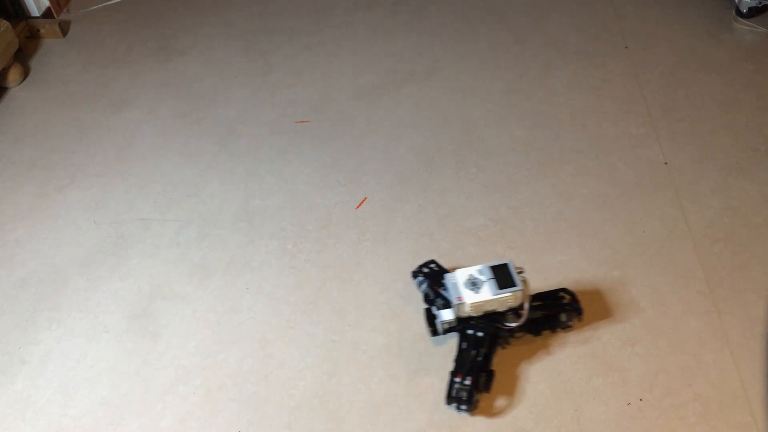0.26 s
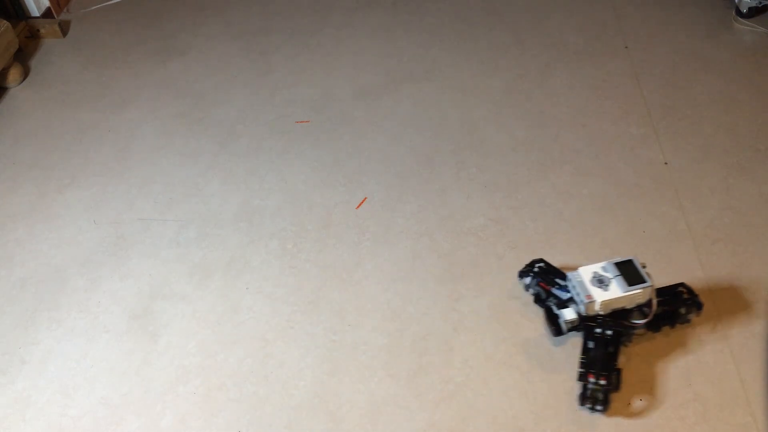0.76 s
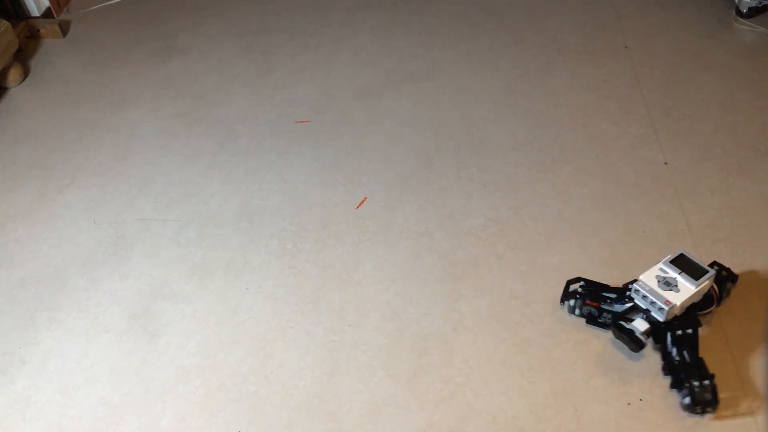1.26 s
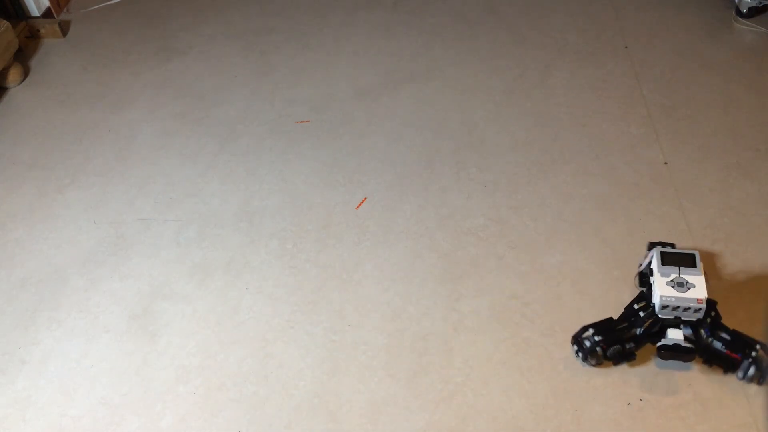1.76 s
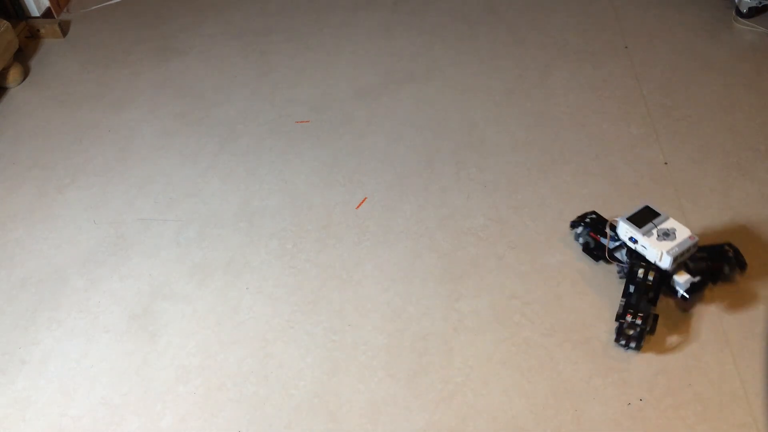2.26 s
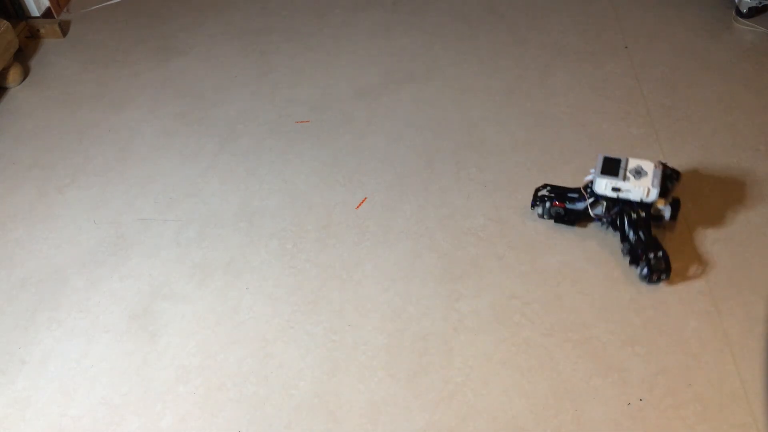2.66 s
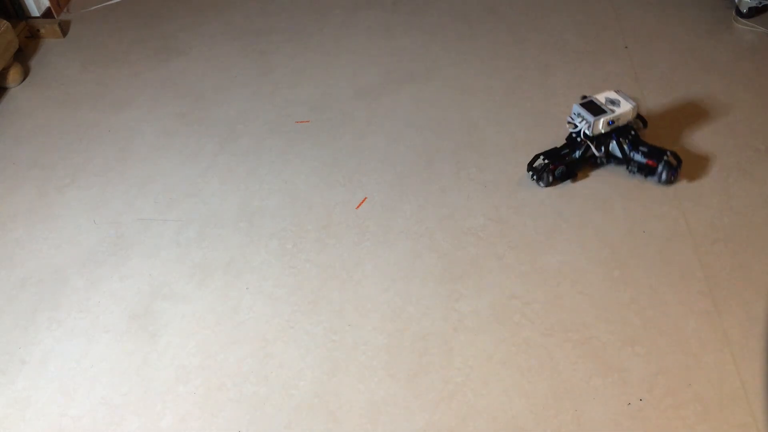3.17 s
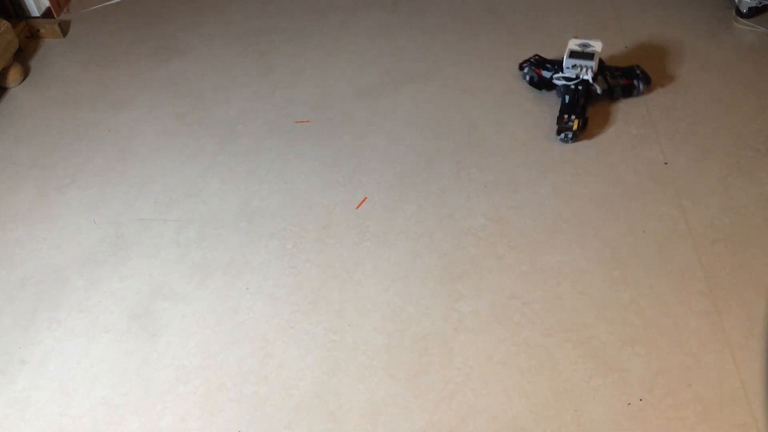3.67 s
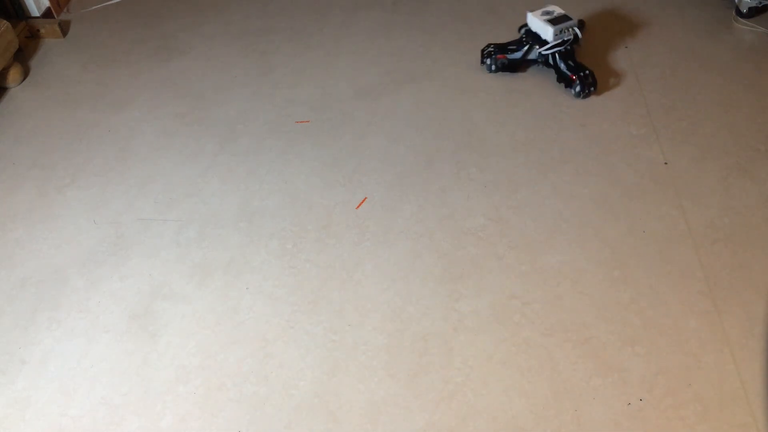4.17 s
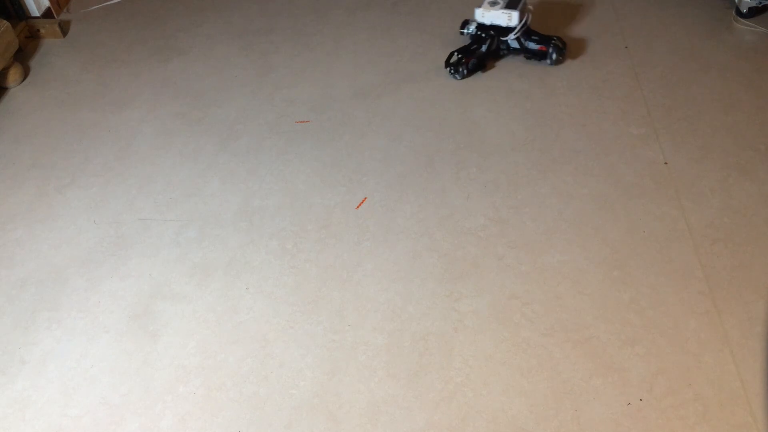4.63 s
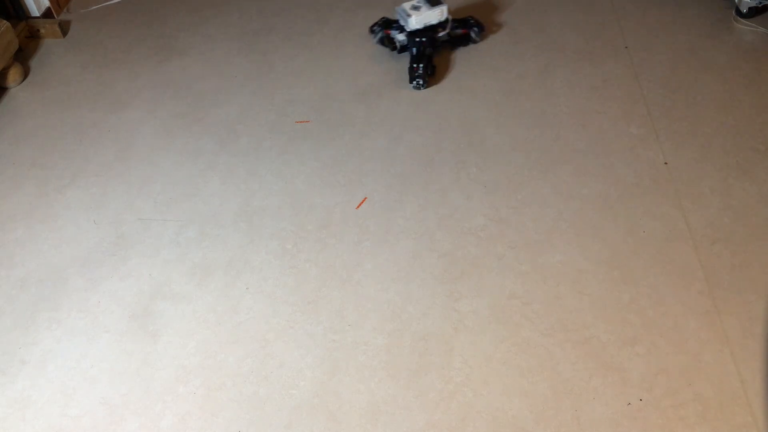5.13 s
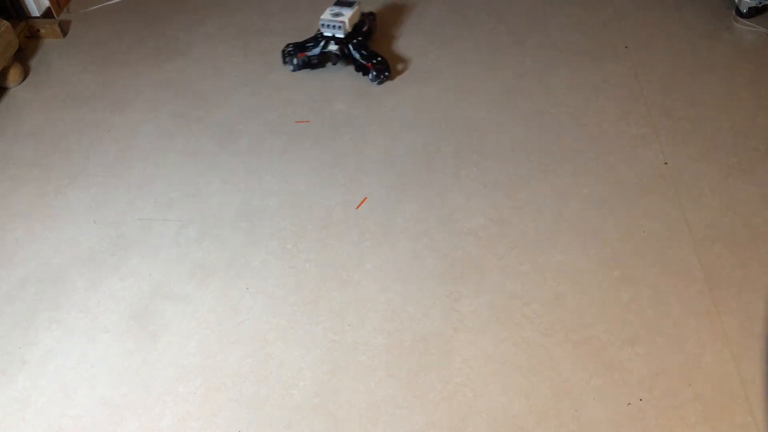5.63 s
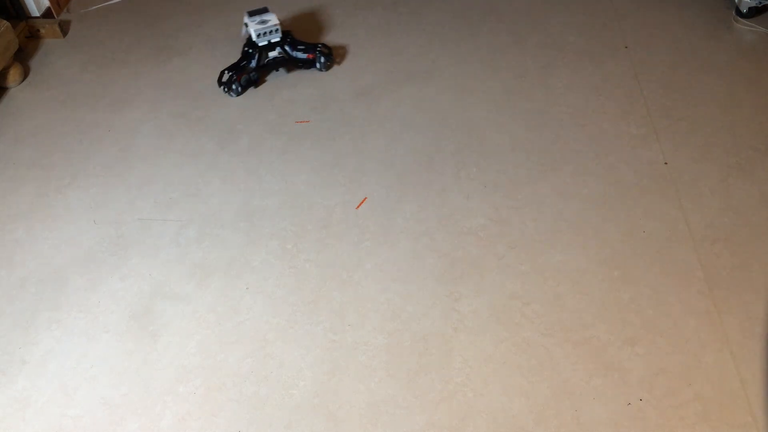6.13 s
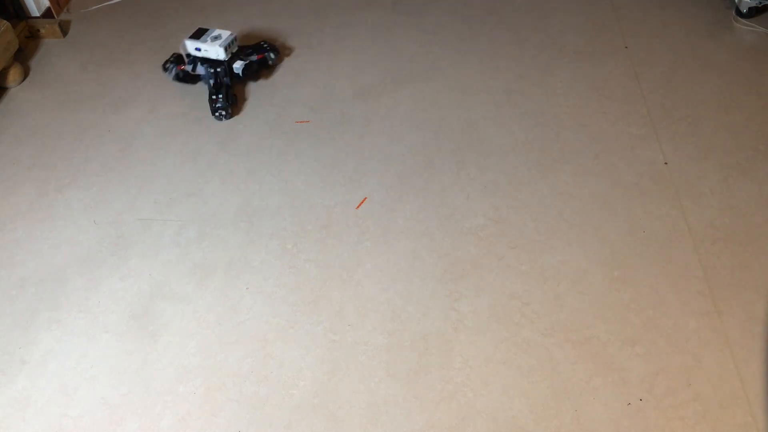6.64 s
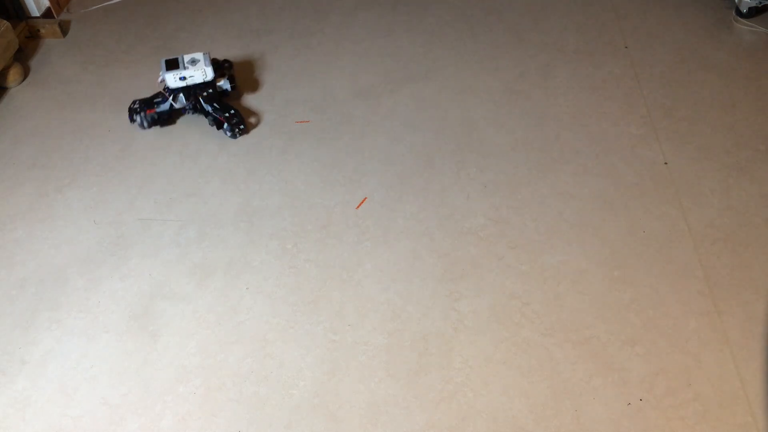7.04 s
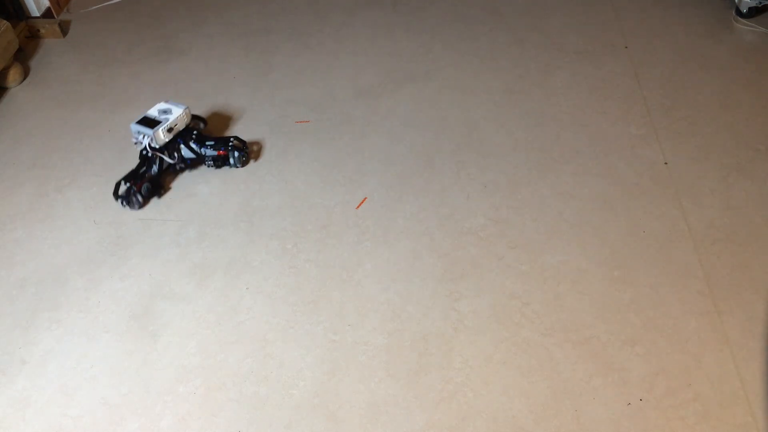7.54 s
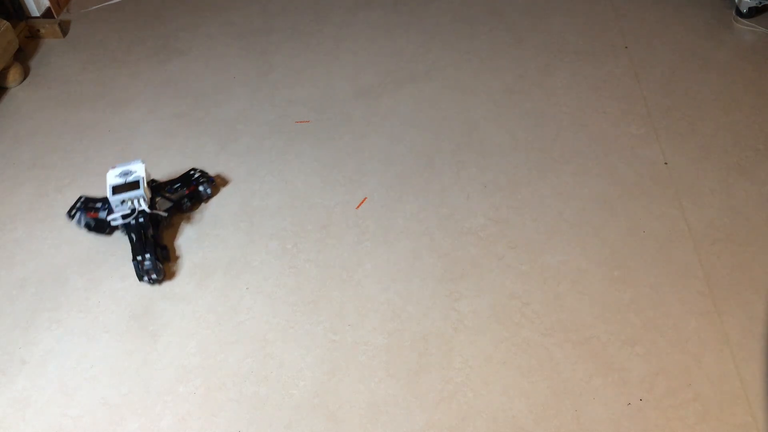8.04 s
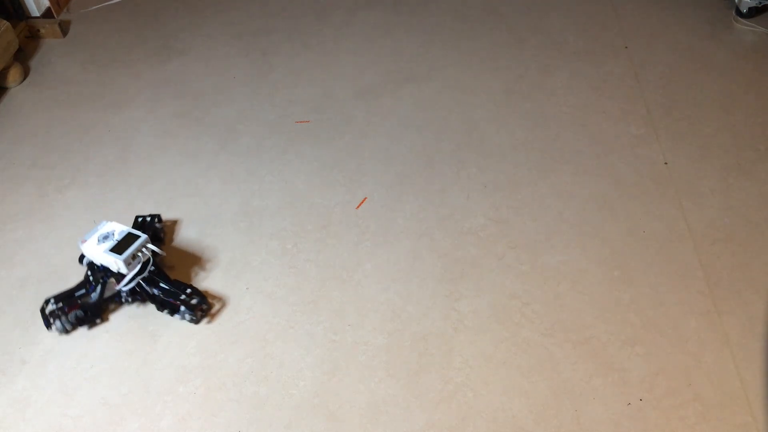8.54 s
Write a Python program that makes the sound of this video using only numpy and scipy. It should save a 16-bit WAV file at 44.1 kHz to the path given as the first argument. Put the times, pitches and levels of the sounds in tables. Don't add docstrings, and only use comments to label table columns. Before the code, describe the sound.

A small wheeled toy robot circles a hard floor indoors. Two electric motors whine quietly at first, one slowing down and fading; then the motors take turns leading, rising and easing in three louder surges. Bright plastic gear and roller hiss runs throughout, roughened by a rattle at each reversal. A distant appliance hums low. One microphone in the room, short reverberation, no stereo spread.

```python
import sys
import numpy as np
from scipy import signal
from scipy.fft import rfft, irfft
from scipy.io import wavfile
from scipy.ndimage import uniform_filter1d

SR = 44100
rng = np.random.default_rng(int(sys.argv[2]) if len(sys.argv) > 2 else 0)


def to_linear_factor(level_db):
    exponent = np.asarray(level_db, float) / 20
    return 10 ** exponent


def file_out(sig):
    cols = np.atleast_2d(sig).T
    lim = np.clip(cols, -1, 1)
    pcm = np.round(lim * 32767).astype(np.int16)
    wavfile.write(sys.argv[1], SR, pcm)


N = 388080

# (frequency [Hz], level [dB per Hz])
AIR = [(15, -39), (25, -33), (65, -10.5), (160, -1), (210, 2.5), (233, -4), (263, -2.5), (452, -5),
       (657, -10), (900, -17), (1170, -61), (1980, -120)]
AIR_DB = -71.5
# (frequency [Hz], waver rate [Hz], waver depth [dB], level [dB])
HUM = [(60, 7.8, 3, -80.5), (90.05, 3.4, 1.5, -80), (120.6, 5.5, 3, -77.5), (168.3, 8, 2.5, -78.5),
       (213.7, 16, 1, -70.5), (1087, 9.8, 5, -77.5)]

# (low [Hz], high [Hz])
GEAR_BANDS = [(700, 3000), (3000, 6000), (6000, 11000), (11000, 15500)]
# (frequency [Hz], level [dB per Hz])
GEAR_COLOUR = [(350, -37), (600, -33.5), (950, -20.5), (1180, -21), (1610, -8.5), (1820, -5), (2440, -1.5),
               (3920, 8), (4370, 6), (4930, 13.5), (6040, 8.5), (7100, 10.5), (12000, 12.5), (14300, 8.5),
               (15100, 4)]
# (time [s], effort [dB], facing [dB])
DRIVE = [(0.0, -40, -16), (0.07, -40.5, -17.5), (0.59, -40, -13), (1.54, -52, -13), (2.47, -41.5, -7.5),
         (3.82, -47.5, -3.5), (4.04, -49, -8.5), (4.41, -45.5, -8.5), (4.51, -47.5, -10), (4.83, -47, -6.5),
         (4.97, -46, -4.5), (5.51, -43, -6), (6.42, -43.5, -12.5), (6.57, -48, -9), (7.06, -45.5, -4.5),
         (7.87, -44, -3), (8.46, -42.5, -4), (8.8, -42, -9)]
USUAL_EFFORT_DB, USUAL_FACING_DB = -45, -9
# (usual level [dB], share of effort [dB/dB], share of facing [dB/dB], lift in a reversal [dB])
GEAR_LAYERS = [
    (-47, 0.37, 0.037, 5.5),
    (-49.5, 0.85, 0.09, 0.8),
    (-51.5, 0.97, 0.3, .7),
    (-54, 0.61, 1, -3.1),
]
# (time [s], half length [s], strength [0-1])
REVERSALS = [
    (1.75, 0.39, 0.88),
    (2.888, 0.79, 0.77),
    (5.25, 0.53, 0.86),
    (7.646, 0.56, 1.04),
]

# (time [s], tooth-mesh rate [Hz], load [dB], brightness [dB per octave], even against odd tones [dB])
SLOWING = [(0, 606.4, -51.5, 3.5, 1), (.3, 595, -58.5, 12, -2.5), (.56, 607, -52.5, 4, 2),
           (.7, 602, -56, 3, -2), (.82, 561.5, -56.5, -16, -5), (1.12, 484.5, -56.5, 0, 1),
           (1.4, 424, -61.5, 4, 7), (1.55, 416, -68, 7, 7)]
CRUISING = [(0, 945, -55, 7, -0.88), (.2, 985, -52.5, 6, -1.5), (.5, 931, -61, 6, 0.96),
            (0.679, 988, -55, 4, 0.52), (.8, 954, -71, 5, 1.5)]
FIRST_TURN = [(1.75, 500, -71, 2, -9), (1.83, 542.4, -56.5, -17, -5.5), (2.03, 557.6, -58, -10, -1),
              (2.151, 723, -51, 6, -1), (2.4, 804, -49.5, -6.5, 1.5), (2.62, 971.6, -46, 8.5, -1.5),
              (2.85, 820, -49.5, 2.5, 2), (3.05, 609, -57, 3, -1.5), (3.298, 456, -61, 3, 3)]
RISE_1 = [(2.85, 576.5, -61, 4, 3), (3.07, 724.5, -55.5, 1.5, 5.5), (3.3, 898, -45.5, 6.5, 1.5),
          (3.46, 972, -55, 6.5, 1.5), (3.71, 981, -47, 0.5, -5.5), (3.869, 929.4, -48.5, 4.5, 1),
          (4.03, 822.7, -52, -5.5, -4), (4.16, 785.4, -53, 4, 9.5), (4.3, 786.4, -45.5, -6, -5.5)]
EASE_1 = [(4.259, 780, -50, 7.5, 1.5), (4.5, 774.7, -53, 0.5, 1.43), (4.69, 765, -50, 1.9, 2.5),
          (4.77, 812.6, -47.5, 4.5, 2.4), (4.9, 832.6, -49, 4.7, 2.1), (5.0, 877, -51, 1.9, 1.5),
          (5.08, 853.6, -49, 3.8, 1.7), (5.2, 762, -50, 5.3, 2.6), (5.35, 675, -56, 1, 1.6)]
RISE_2 = [(5.1, 480, -70, 15, -4), (5.29, 680, -50, -2, -3.5), (5.44, 799, -47.5, 5.5, 2.5),
          (5.581, 869, -48.5, -1, -3), (5.68, 967, -48, 5.5, -0.5), (5.94, 982.7, -51, 2.5, -1),
          (6.26, 847, -55, -5.5, -0.5), (6.399, 790, -49.5, -12, -4.5), (6.5, 783.7, -45.5, -3, -1.5)]
EASE_2 = [(6.46, 782, -47, -1, -4), (6.62, 780.5, -43.5, -2, -3.5), (6.731, 824, -47.5, 3, 1.5),
          (6.818, 775.7, -45, -5, -3.5), (7.03, 846.5, -49.5, 1, -1), (7.17, 833, -49.5, 1.5, -3),
          (7.4, 916, -46.5, 7, 1.5), (7.529, 713, -51, -10, -5), (7.65, 655, -67, 1.5, 8)]
RISE_3 = [(7.45, 527, -56, -1, -3), (7.58, 647, -58, -4, -5), (7.72, 735, -48, 0.5, -0.5),
          (7.92, 938, -47, 2, 2), (8.15, 994, -49.5, 2, 2), (8.26, 901.6, -49.5, -2.5, 1),
          (8.599, 826.6, -50.5, -8.5, 1.5), (8.749, 776, -48, -2, -1.5), (8.8, 788, -57, -9, 2)]
TRAILING_1 = [(3.401, 736, -68, 1.5, -5), (3.66, 741, -69, 1.26, -9), (3.75, 757, -63, 1.5, -10)]
TRAILING_2 = [(5.7, 741, -69, 1.5, -12), (6.169, 685, -68, 1.5, -11), (6.35, 626, -64, 1.5, 0)]
LONGEST_S = 1.7
LOOSE_DB = 23.5

TOOTH_DB = [-23.5, 1.28, 0.5, -3.5, -5.5]
HALF_DB, UPPER_DB = -30, -2.5
# (frequency [Hz], level [dB])
CASE = [(900, -12), (1250, -4), (1600, -5), (1900, 2), (2250, -4), (3000, 2.5), (3950, -2.6), (4850, -2.6)]
# (frequency [Hz], level [dB])
UPPER = [(2500, -4), (4000, -6), (5400, -5), (6100, -13), (7100, -9), (8000, -12), (8800, -11), (9500, -16),
         (13500, -20), (15500, -28)]

# (frequency [Hz], width [Hz], lift [dB])
HOUSING = [(3900, 120, 5), (4960, 190, -8), (5440, 100, 1.5), (7120, 180, 7), (8500, 230, 1),
           (10300, 570, 2.5)]
# (time [s], share [about 0-1])
OPEN = [(0, 1.1), (.7, 0.9), (1.4, 0.8), (2.0, 0), (2.5, 0.5), (3.0, 0.21), (3.6, 0.6), (5, 0.3),
        (6.5, 0.2), (7.3, 0.7), (8.2, 0.27), (8.8, 1.1)]
# (frequency [Hz], time to fall 60 dB [s])
ROOM = [(500, 0.27), (3000, 0.38), (12000, 0.14)]


def evened(x):
    return x / np.sqrt(np.mean(x ** 2) + 1e-20)


def read(points, hz):
    f, value = np.transpose(points)
    return np.interp(np.log(hz + 1), np.log(f + 1), value)


def drift(size, hz, drawn=0):
    step = 1 if hz > 200 else 32
    settle = SR // 4
    noise = rng.standard_normal((max(size, drawn) + settle) // step + 2)
    lowpass = signal.butter(2, hz, fs=SR / step, output="sos")
    slow = signal.sosfilt(lowpass, noise)[settle // step:]
    return np.interp(np.arange(size) / step, np.arange(len(slow)), evened(slow))


def add(mix, s, sound):
    part = mix[round(s * SR):][:len(sound)]
    part += sound[:len(part)]


def quiet_room():
    hz, t = np.fft.rfftfreq(N, 1 / SR), np.arange(N) / SR
    rumble = irfft(rfft(rng.standard_normal(N)) * to_linear_factor(read(AIR, hz)), N)
    out = to_linear_factor(AIR_DB) * evened(rumble)
    for f, waver_hz, waver_db, db in HUM:
        phase = 2 * np.pi * f * t + 0.38 * waver_db * drift(N, waver_hz)
        level = to_linear_factor(db + waver_db * drift(N, waver_hz))
        out += np.sqrt(2) * level * np.cos(phase)
    return out


def gears(flicker_db=0.5, grit_db=-0.5):
    clicks = rng.standard_normal(N + 1024) * to_linear_factor(grit_db * drift(N + 1024, 2500))
    hz, t, z = signal.stft(clicks, SR, nperseg=512, noverlap=384)
    s, effort_db, facing_db = np.transpose(DRIVE)
    effort = np.interp(t, s, effort_db - USUAL_EFFORT_DB)
    facing = np.interp(t, s, facing_db - USUAL_FACING_DB)
    backlash = sum(size * np.exp(-((t - at) / half) ** 2) for at, half, size in REVERSALS)
    power = to_linear_factor(read(GEAR_COLOUR, hz)) ** 2
    lifts = []
    for (low, high), (db, a, b, c) in zip(GEAR_BANDS, GEAR_LAYERS):
        in_band = (hz >= low) & (hz < high)
        share_db = 10 * np.log10(power[in_band].sum() / power.sum())
        lifts.append(db + a * effort + b * facing + c * backlash - share_db)
    centres = np.log([np.sqrt(low * high) for low, high in GEAR_BANDS])
    blend = np.array([np.interp(np.log(hz + 1), centres, row) for row in np.eye(len(lifts))])
    z *= to_linear_factor(blend.T @ np.array(lifts)) * np.sqrt(power / power.mean())[:, None]
    hiss = signal.istft(z, SR, nperseg=512, noverlap=384)[1][:N]
    return hiss * to_linear_factor(flicker_db * drift(N, 33))


def whine(rows, loose_db=0, wobble_hz=30, fade_db=3, fade_hz=25, swing_hz=5, smear=0.7, smear_hz=40):
    s, *columns = np.transpose(rows)
    t = np.arange(s[0], s[-1], 1 / SR)
    hz, load_db, tilt_db, even_db = (np.interp(t, s, c) for c in columns)

    def wander(rate_hz):
        return drift(len(t), rate_hz, round(LONGEST_S * SR))

    turns = np.cumsum(hz * (1 + .0065 * wander(wobble_hz))) / SR
    tones = np.sqrt(2) * to_linear_factor(load_db + HALF_DB + loose_db) * np.cos(np.pi * 3 * turns)
    for k in range(1, 17):
        if k < 6:
            db = TOOTH_DB[k - 1] + read(CASE, k * hz) + (-1) ** k * even_db + (k == 1) * loose_db
        else:
            db = UPPER_DB + read(UPPER, k * hz)
        phase = 2 * np.pi * k * turns + smear * wander(smear_hz)
        if k < 6:
            fade = fade_db * wander(fade_hz) + .8 * wander(swing_hz)
        else:
            fade = 2.6 * wander(8) - .8
        lean = tilt_db * np.log2(np.clip(k, 2, 5) / 3)
        tones += np.sqrt(2) * to_linear_factor(load_db + db + lean + fade) * np.cos(phase)
    since_start = np.where(s[0] < .01, 1, t - s[0])
    until_end = np.where(s[-1] > N / SR - .02, 1, s[-1] - t)
    edge = np.minimum(since_start, until_end)
    return s[0], tones * np.sqrt(np.clip(edge / 0.021, 0, 1))


def housing(x, patchy_db=0.5, banded_db=1.5):
    hz, t, z = signal.stft(x, SR, nperseg=512, noverlap=384)
    a, b = rng.standard_normal((2,) + z.shape)
    patches = evened(uniform_filter1d(uniform_filter1d(a, size=6, axis=0), size=14, axis=1))
    bands = evened(uniform_filter1d(uniform_filter1d(b, size=3, axis=0), size=60, axis=1))
    lift_db = sum(db / (1 + ((hz - f) / width * 2) ** 2) for f, width, db in HOUSING)
    ring_db = np.outer(lift_db, np.interp(t, *np.transpose(OPEN)))
    z *= to_linear_factor(ring_db + patchy_db * patches + banded_db * bands)
    return signal.istft(z, SR, nperseg=512, noverlap=384)[1][:N]


def walls(x):
    taps = np.zeros(SR // 2)
    at = np.arange(200, len(taps) - 20, 20)
    taps[at + rng.integers(0, 20, len(at))] = rng.choice([-1., 1.], len(at))
    hz, t, z = signal.stft(taps, SR, nperseg=256)
    t60 = np.interp(hz, *np.transpose(ROOM))
    tail = signal.istft(z * to_linear_factor(-60 * t / t60[:, None]), SR, nperseg=256)[1]
    return signal.fftconvolve(x, tail / np.linalg.norm(tail))[:N]


def scene():
    motors = np.zeros(N)
    for rows in (SLOWING, CRUISING, FIRST_TURN, RISE_1, EASE_1, RISE_2, EASE_2, RISE_3,
                 TRAILING_1, TRAILING_2):
        add(motors, *whine(rows, LOOSE_DB * (rows is CRUISING)))
    robot = housing(to_linear_factor(-4.5) * motors + gears())
    mono = robot + to_linear_factor(-5.5) * walls(motors) + quiet_room()
    return np.array([mono, mono])


def thinned(x):
    hz, t, z = signal.stft(x, SR, nperseg=2048, noverlap=1536)
    power = uniform_filter1d(uniform_filter1d(abs(z) ** 2, size=4, axis=0), size=4, axis=1)
    level_db = 10 * np.log10(power + 1e-20)
    usual_db = uniform_filter1d(uniform_filter1d(level_db, size=50, axis=0), size=30, axis=1)
    facing = np.clip(np.interp(t, *np.transpose(DRIVE)[::2]) + 9, 0, 5)
    bar_db = np.select([hz > 12600, hz > 4000], [-.5, -6.3], -60)[:, None]
    bar_db = bar_db - np.outer(hz > 12600, .3 * facing)
    steps_up = (rng.random((3, len(t) // 4 + 1)) < .85).sum(0)
    edge_hz = 14950 + 130 * steps_up.repeat(4)[:len(t)]
    kept = (level_db > usual_db + bar_db) & (hz[:, None] < edge_hz)
    return signal.istft(z * kept, SR, nperseg=2048, noverlap=1536)[1][:N]


def low_pass(x):
    return signal.sosfilt(signal.butter(12, 15280, fs=SR, output="sos"), x)


def record(dry):
    mono = thinned(dry[0])
    return low_pass(np.array([mono, mono]))


dry = scene()
out = record(dry)
file_out(out)
```